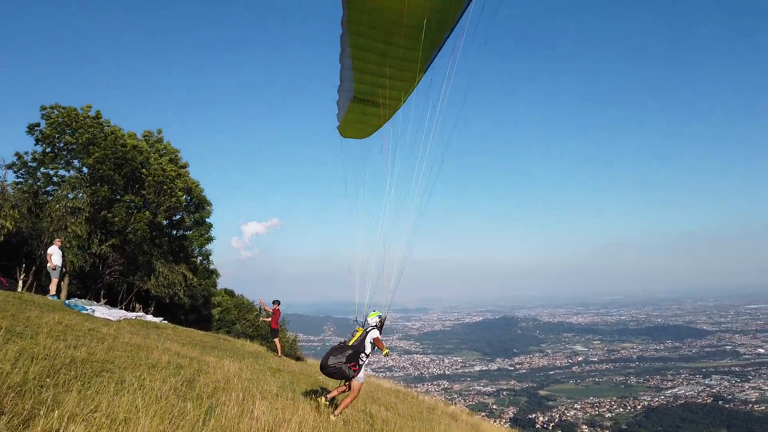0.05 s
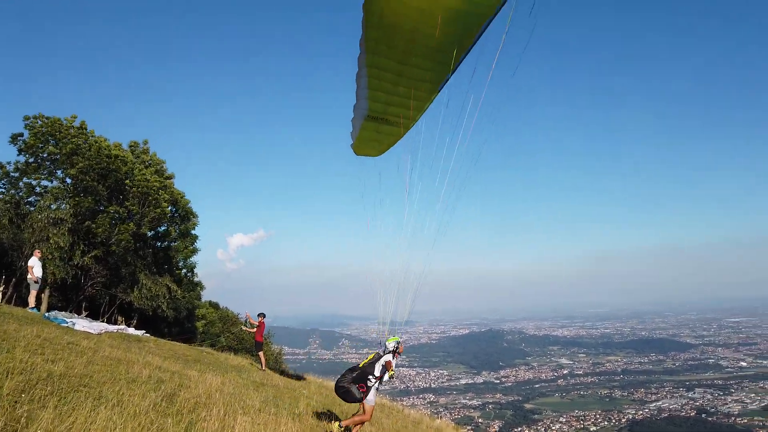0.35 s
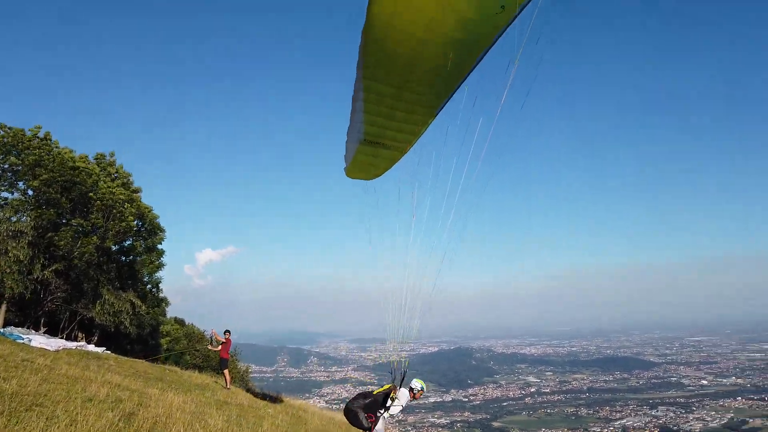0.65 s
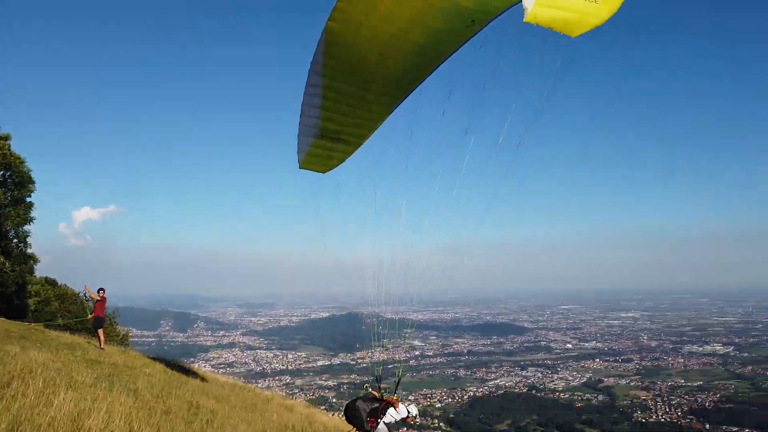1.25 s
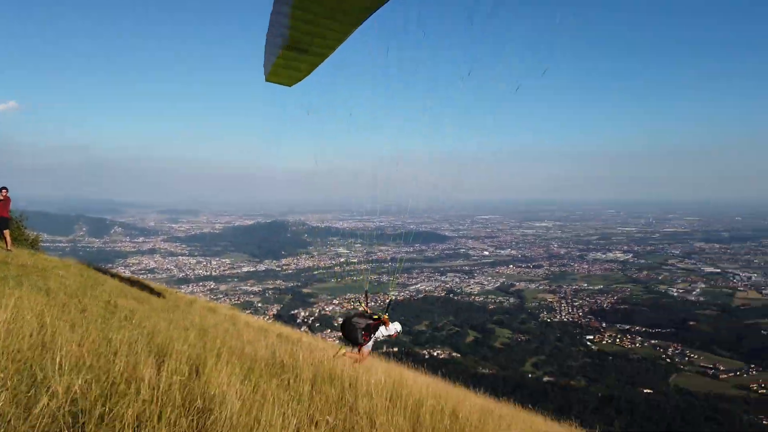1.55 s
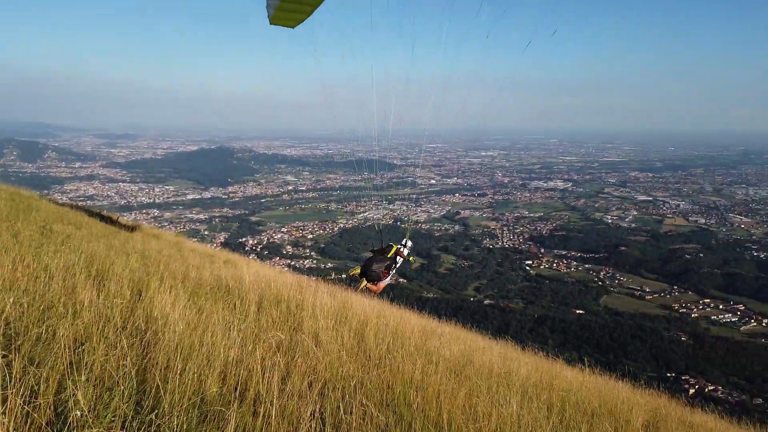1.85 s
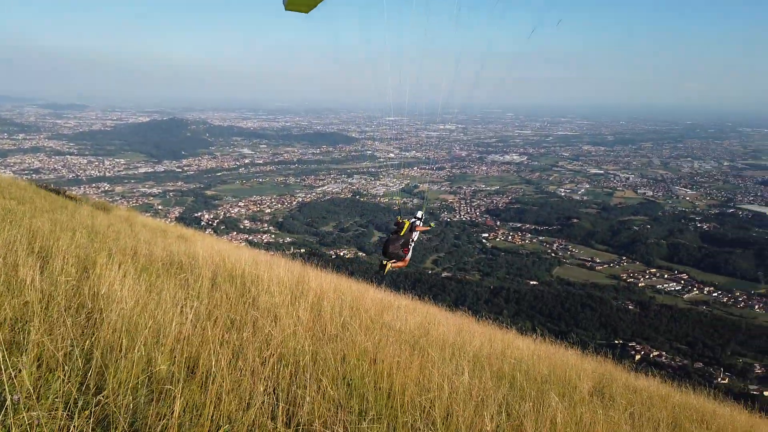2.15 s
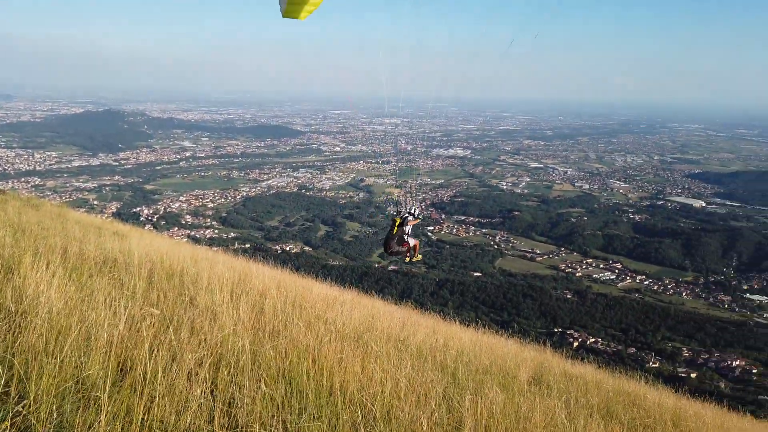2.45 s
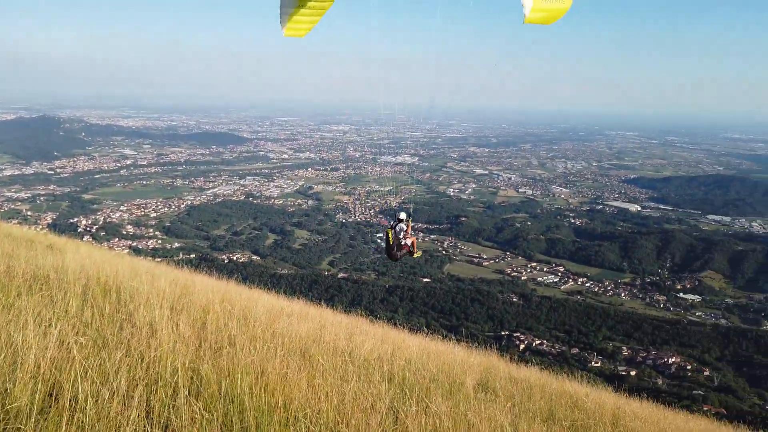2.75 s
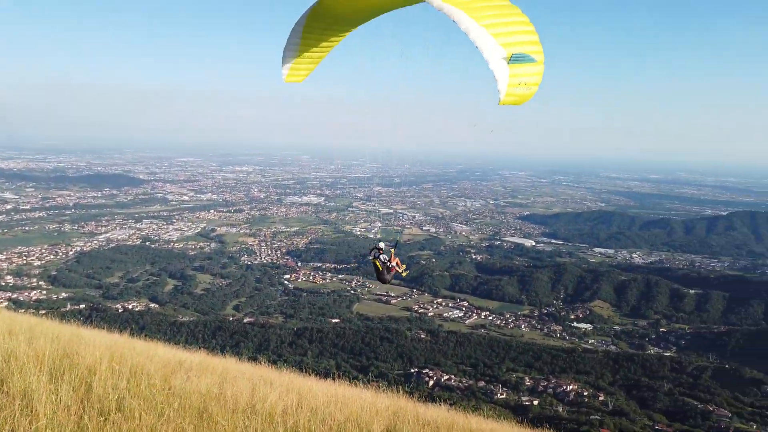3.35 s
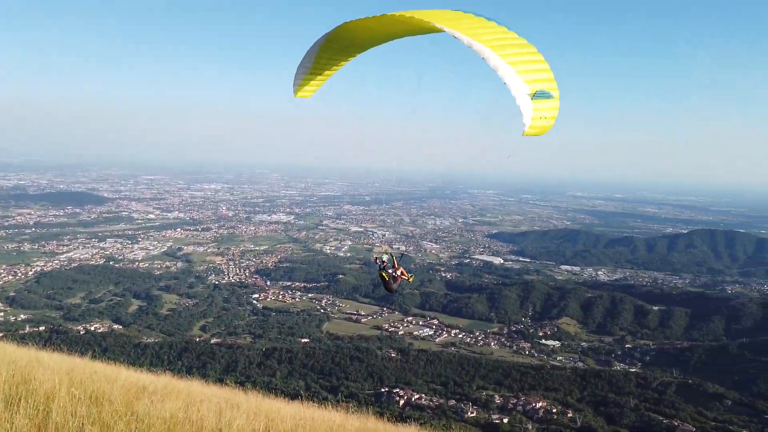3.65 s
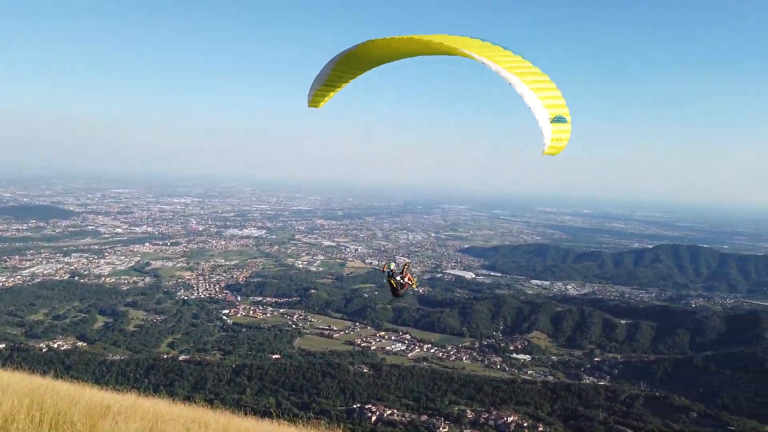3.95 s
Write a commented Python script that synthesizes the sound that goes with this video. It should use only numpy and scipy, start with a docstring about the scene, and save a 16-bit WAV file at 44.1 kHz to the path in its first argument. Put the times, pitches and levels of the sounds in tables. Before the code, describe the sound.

Wind buffets the microphone as a paraglider rushes past and fades away.

```python
"""A paraglider launches from a grassy slope, passes over the camera and glides away.
Air rushes through the wing and its lines, swells overhead, then dulls to a faint, distant whistle.
Dry grass swishes and the harness scuffs during the run; later a few stalks snap close by.
Wind buffets the camera's two microphone ports throughout, apart from one lull,
over the faint hiss and low drone of the open hillside."""
import sys
import numpy as np
from scipy import signal
from scipy.fft import rfft, irfft, next_fast_len
from scipy.io import wavfile
from scipy.ndimage import uniform_filter1d, map_coordinates

SR = 44100
rng = np.random.default_rng(int(sys.argv[2]) if len(sys.argv) > 2 else 0)


def unload_wav(signal):
    """Save mono or channel-first audio to the path in sys.argv[1] as 16-bit WAV at rate SR, clipped to [-1, 1]."""
    wavfile.write(
        sys.argv[1],
        SR,
        np.round(np.clip(np.atleast_2d(signal).T, -1, 1) * 32767).astype(np.int16),
    )


N = 176400


def amp(db):
    """Decibels to gain."""
    return 10 ** (np.asarray(db) / 20)


def unit_rms(x):
    """Scale to rms 1."""
    return x / np.sqrt(np.mean(x ** 2) + 1e-20)


def along(points, hz):
    """Interpolate (freq_hz, value) points on a log frequency axis."""
    freqs, values = np.transpose(points)
    return np.interp(np.log(hz + 1), np.log(freqs + 1), values)


def clock():
    """The time of each sample in seconds."""
    return np.arange(N) / SR


def curve(rows):
    """Join (time_s, value) points by lines."""
    return np.interp(clock(), *np.transpose(rows))


def swell(centre_s, width_s):
    """A bell-shaped envelope; the width is its standard deviation."""
    return np.exp(-.5 * ((clock() - centre_s) / width_s) ** 2)


def swells(rows):
    """The summed envelope of (centre_s, width_s, level_db) rows."""
    return sum(amp(db) * swell(centre_s, width_s) for centre_s, width_s, db in rows)


def fade(centre_s, width_s):
    """A smooth step from 0 to 1."""
    return .5 + .5 * np.tanh((clock() - centre_s) / width_s)


def wobble(rate_hz):
    """A smooth random curve with rate_hz knots a second."""
    knots = rng.standard_normal(int(N * rate_hz / SR) + 4)
    return map_coordinates(knots, [clock() * rate_hz])


def filtered(x, response):
    """Filter x by a complex response, given as a function of frequency."""
    size = next_fast_len(N + SR // 2)
    return irfft(rfft(x, size) * response(np.fft.rfftfreq(size, 1 / SR)), size)[..., :N]


def noise(colour, patchy_db):
    """Two coloured noises of rms 1, with patches of random gain in time and frequency."""
    spectra = signal.stft(rng.standard_normal((2, N)), nperseg=512)[2]
    patches = uniform_filter1d(rng.standard_normal(spectra.shape[1:]), size=4, axis=0)
    patches = unit_rms(uniform_filter1d(patches, size=16, axis=1))
    pair = signal.istft(spectra * amp(patchy_db * patches), nperseg=512)[1][:, :N]
    return unit_rms(filtered(pair, lambda hz: amp(along(colour, hz))))


# Scaling of the delay between the two microphone ports: freq_hz, factor
PORT_DELAY_SCALE = [(150, .1), (400, 0.93), (700, 0.48), (1050, 1.12), (1350, 0.66), (1750, 0.86),
                    (2400, 1.18), (4000, 0.95), (15000, 1)]

def at_ports(pair, likeness, nominal_lead_ms):
    """Two unrelated noises become a partly alike left and right; a positive lead puts the left first."""
    def mid_side_gains(hz):
        angle = np.arccos(np.clip(along(likeness, hz), -1, 1)) / 2
        return np.array([np.cos(angle), np.sin(angle)])

    def delay(hz):
        lead_s = nominal_lead_ms / 1000 * along(PORT_DELAY_SCALE, hz)
        return np.exp(1j * np.pi * lead_s * np.array([hz, -hz]))

    mid, side = filtered(pair, mid_side_gains)
    return filtered(np.array([mid + side, mid - side]), delay)


# Open air over the slope: freq_hz, relative_db
DRONE_COLOUR = [(15, -1.5), (40, 3), (80, -6), (130, -7), (200, -15.5), (350, -24), (600, -34), (2000, -70)]

def open_air_drone(level_db=-52.5):
    """A low rumble, the same at both ports, left bare when the wind drops."""
    return noise(DRONE_COLOUR, patchy_db=3.5)[0] * amp(level_db)


# The hillside all around the camera: freq_hz, relative_db
HISS_COLOUR = [(200, -24), (600, -3), (2500, 9.5), (4000, -2), (6100, -10.5), (7500, 6), (9700, -4.5),
               (12000, -2), (15500, -12)]

def hillside_hiss(level_db=-67.5, drift_db=0.83, grain_db=1):
    """A faint, grainy hiss whose level wavers."""
    hiss = noise(HISS_COLOUR, patchy_db=3) * amp(level_db + drift_db * wobble(9.3))
    return hiss * unit_rms(amp(grain_db * wobble(500)))


# Gusts right on the microphone: time_s, relative_db
GUST_LEVELS = [(0, -35), (.36, -33.5), (.42, -41), (.5, -43), (.65, -64), (.85, -86), (.95, -46),
               (1.04, -35), (1.15, -41), (1.26, -34), (1.66, -34.5), (1.74, -47), (1.83, -33),
               (1.95, -35.5), (2.02, -46), (2.11, -49), (2.17, -37), (2.38, -36.5), (2.52, -37),
               (2.75, -33), (3.15, -36.5), (3.3, -32.5), (3.45, -34.5), (3.62, -34), (4, -36.5)]
# Their rumble: freq_hz, relative_db
WIND_COLOUR = [(12, -5.5), (25, 3.5), (50, 1.5), (100, -9), (160, -19), (250, -29), (400, -37.5),
               (800, -72), (2000, -82)]
# Wind from port to port: freq_hz, likeness
WIND_LIKENESS = [(30, 0.056), (120, 0.73), (400, 0.25)]
# Eddies fluttering on the ports: centre_s, width_s, band_hz, level_db
FLUTTERS = [(0.297, 0.017, 91, -33), (0.348, 0.0072, 85, -32), (1.344, 0.017, 115, -41.5),
            (1.665, 0.01, 175, -35.5), (2.171, 0.019, 84, -35.5), (2.459, .01, 145, -37.5),
            (2.547, 0.0075, 157, -40), (2.775, 0.023, 262, -54), (2.923, 0.019, 267, -55),
            (3.492, 0.007, 127, -41), (3.596, 0.021, 111, -38), (3.79, .014, 129, -35.5),
            (3.801, 0.0075, 226, -35)]

def wind_buffeting(gain_db=1, lumps_db=2, steady_s=0.16, band_octaves=0.65):
    """Wind on the ports makes a choppy rumble that follows the gusts, with a few distinct flutters."""
    rumble = noise(WIND_COLOUR, patchy_db=3.0) * amp(lumps_db * wobble(45))
    power = uniform_filter1d(rumble ** 2, size=int(steady_s * SR), axis=1)
    rumble /= np.sqrt(np.abs(power) + 1e-9)  # only the quick lumps remain
    wind = rumble * amp(curve(GUST_LEVELS) + gain_db)
    for centre_s, width_s, band_hz, db in FLUTTERS:
        band = lambda hz: np.exp(-.5 * (np.log2((hz + 1) / band_hz) / band_octaves) ** 2)
        puff = filtered(rng.standard_normal((2, N)), band)
        envelope = swell(centre_s, width_s)
        wind += amp(db) * unit_rms(puff * envelope) * np.sqrt(np.mean(envelope ** 2))
    return at_ports(wind, WIND_LIKENESS, nominal_lead_ms=0)


# Single eddies striking both ports at once: centre_s, width_s, envelope_db
EDDY_HITS = [(0.955, 0.0048, -26), (2.453, 0.013, -27), (2.542, 0.0087, -25.5)]

def eddy_thumps(flip_s=0.0014):
    """An eddy pushes on the ports, then flips abruptly to suction as it passes."""
    return sum(amp(db) * swell(centre_s, width_s) * (1 - 2 * fade(centre_s, flip_s))
               for centre_s, width_s, db in EDDY_HITS)


# Grass brushed along the launch run: time_s, relative_db
GRASS_LEVELS = [(0, -52), (.06, -54.5), (.11, -50), (.22, -55.5), (.35, -51.5), (.49, -53.5), (.53, -55),
                (.62, -53.5), (.67, -60), (.74, -69.5), (1.05, -66.5), (1.5, -74), (2.3, -77), (4, -91)]
# Strokes on the slope and beside the camera: centre_s, width_s, relative_db
GRASS_SWISHES = [(.134, 0.0088, -46.5), (.47, 0.037, -56.5), (.567, 0.014, -51), (.622, 0.008, -53),
                 (1.03, 0.017, -68), (1.62, .025, -66), (2.09, 0.048, -70)]
HARNESS_SCUFFS = [(.098, 0.0095, -47), (.128, 0.0096, -51), (.305, 0.032, -52), (.63, 0.009, -52.5)]
STALK_SCRAPES = [(2.6, 0.097, -67.5), (2.637, 0.0083, -53), (2.68, 0.036, -67.5), (2.94, 0.05, -67)]
STALK_SNAPS = [(2.633, .0018, -59), (2.643, .0011, -50), (2.925, 0.018, -65)]
# Their colours at the microphone: freq_hz, relative_db
SWISH_COLOUR = [(60, -25), (250, -1.5), (450, -7), (800, 1), (1400, -10.5), (2800, -2.5), (3800, -15.5),
                (5500, -13.5), (7100, -4.5), (7900, -8), (8750, 3), (9400, -2.5), (10400, -8),
                (12500, -12.5), (15500, -14)]
BRIGHT_COLOUR = [(400, -28), (1200, -1), (2200, 17), (3100, 14), (3700, -18), (6000, -14.5), (8300, -12),
                 (11000, -58)]  # scuffs, and also air surging through the lines
SCRAPE_COLOUR = [(1500, -35), (2600, 0), (4000, -20), (6300, -13), (7300, 2), (7900, -1), (8800, -19),
                 (12000, -14), (15500, -25)]
DRY_SNAP_COLOUR = [(1200, -6), (2600, 4), (3400, -12), (6700, -9), (7700, 3), (9000, -15), (15500, -15)]
# Grass from port to port: freq_hz, likeness
GRASS_LIKENESS = [(250, .999), (700, 0.83), (1100, 0.33), (1700, 0.18), (3000, 0.26), (9000, 0.39),
                  (14000, 0.2)]

def grass_and_harness(swish_gain_db=4, crackle_db=1.5):
    """Legs and lines brush dry grass and the harness scuffs; later, stalks scrape and snap close by."""
    swish_envelope = np.hypot(amp(curve(GRASS_LEVELS)), swells(GRASS_SWISHES)) * amp(swish_gain_db)
    swishes = noise(SWISH_COLOUR, patchy_db=2.0) * swish_envelope
    scrapes = noise(SCRAPE_COLOUR, patchy_db=4.5) * swells(STALK_SCRAPES)
    scuffs = noise(BRIGHT_COLOUR, patchy_db=1.0) * swells(HARNESS_SCUFFS)
    snaps = noise(DRY_SNAP_COLOUR, patchy_db=1.0) * swells(STALK_SNAPS)
    crackle = unit_rms(amp(crackle_db * wobble(700)))
    rustle = (swishes + scrapes) * crackle + scuffs + snaps
    return at_ports(rustle, GRASS_LIKENESS, nominal_lead_ms=-.12)


# Lines heard on approach and far off: centre_s, width_s, pitch_hz, level_db, sag_per_s
LINE_TONES = [(2.72, 0.3, 1220, -61.5, .12), (2.6, 0.35, 1520, -63.5, .3), (3.3, 0.32, 1100, -68, .08),
              (3.83, 0.32, 1890, -65, 0), (0.57, 0.88, 2900, -62, .08)]
# Lines and wing from port to port: freq_hz, likeness
GLIDER_LIKENESS = [(300, 0.97), (700, 0.99), (1050, 0.98), (1350, 0.97), (2000, 0.5), (2700, 0.6),
                   (4500, 0.41), (8000, 0.2), (14000, 0.12)]

def line_whistles(fuzz_hz=94):
    """Vortices shed by the lines make fuzzy tones, most of them sagging slowly in pitch."""
    whistles = np.zeros((2, N))
    for centre_s, width_s, pitch_hz, db, sag_per_s in LINE_TONES:
        sagging_hz = pitch_hz * np.exp(-sag_per_s * (clock() - centre_s))
        phase = 2 * np.pi * np.cumsum(sagging_hz) / SR
        # Slow random gains widen the tone into a narrow band.
        cos_gain, sin_gain = filtered(rng.standard_normal((2, 2, N)),
                                      lambda hz: 1 / (1 + (hz / fuzz_hz) ** 2))
        tone = unit_rms(cos_gain * np.cos(phase) + sin_gain * np.sin(phase))
        whistles += amp(db) * swell(centre_s, width_s) * tone
    return at_ports(whistles, GLIDER_LIKENESS, nominal_lead_ms=.12)


# The wing's pass, heard from the slope: time_s, relative_db
RUSH_LEVELS = [(0, -53), (.33, -54), (.55, -60.5), (.82, -55.5), (1.0, -52), (1.26, -48), (1.3, -51.5),
               (1.55, -48.5), (1.64, -43.5), (1.75, -41), (2.03, -47), (2.16, -44), (2.3, -49.5),
               (2.44, -56), (2.58, -62), (2.85, -60), (3.25, -63.5), (3.65, -64), (4, -64)]
# Its rush overhead and far off: freq_hz, relative_db
NEAR_COLOUR = [(60, -11), (220, 5.5), (380, -1.5), (500, -4.5), (640, -0.5), (820, 1.5), (1000, -5.5),
               (1300, 0.5), (1600, -4.5), (2200, -5), (3100, -7), (3600, -12.5), (4800, -15.5), (6200, -19),
               (8200, -22), (9500, -31.5), (15500, -37.5)]
FAR_COLOUR = [(100, -1), (350, -17), (500, -4.5), (750, 1.5), (950, -1), (1200, -1.5), (1700, -2),
              (2300, -6), (2900, -6.5), (3700, -20), (6000, -19), (15000, -30)]
# Brighter surges through the lines at close range: centre_s, width_s, level_db
LINE_SURGES = [(1.235, 0.027, -48), (1.76, 0.11, -50), (1.95, 0.0096, -52), (2.2, 0.15, -52.5)]

def wing_rush(gain_db=3, flicker_db=0.7, low_cut_hz=540):
    """Air rushes through wing and lines: thin on approach, full overhead, dull once far off."""
    near = noise(NEAR_COLOUR, patchy_db=2)
    far = noise(FAR_COLOUR, patchy_db=1.5)
    thin = unit_rms(filtered(near, lambda hz: hz ** 2 / (hz ** 2 + low_cut_hz ** 2)))
    overhead = fade(centre_s=0.98, width_s=0.13)
    gone = fade(centre_s=2.42, width_s=0.065)
    arriving = overhead * near + (1 - overhead) * thin
    air = np.sqrt(1 - gone) * arriving + np.sqrt(gone) * far
    surges = noise(BRIGHT_COLOUR, patchy_db=-1.5) * swells(LINE_SURGES)
    envelope = amp(curve(RUSH_LEVELS) + gain_db + flicker_db * wobble(22.32))
    return at_ports(air * envelope + surges, GLIDER_LIKENESS, nominal_lead_ms=.12)


def scene():
    """The launch from the camera's spot on the slope, with wind on the microphone."""
    hillside = hillside_hiss() + open_air_drone()
    launch = wing_rush() + line_whistles() + grass_and_harness()
    return hillside + launch + wind_buffeting() + eddy_thumps()


def record(dry, top_hz=15800):
    """The camera keeps nothing above its band limit."""
    return filtered(dry, lambda hz: hz < top_hz)


dry = scene()
out = record(dry)
unload_wav(out)
```